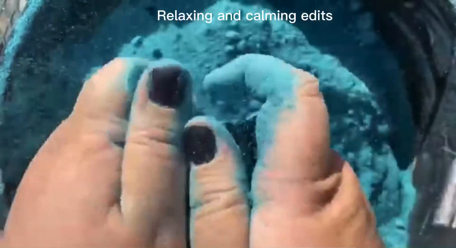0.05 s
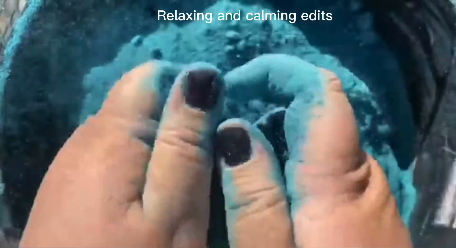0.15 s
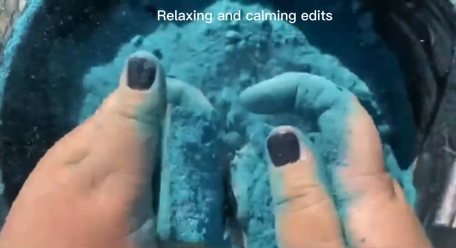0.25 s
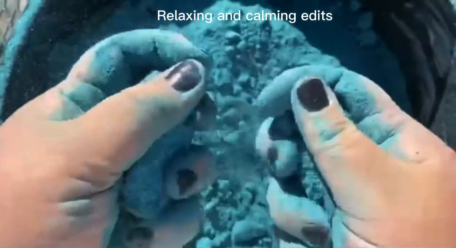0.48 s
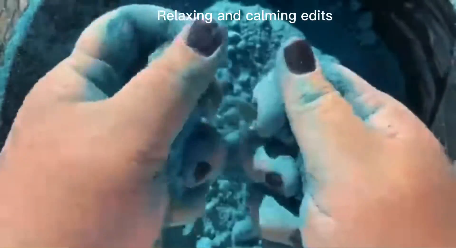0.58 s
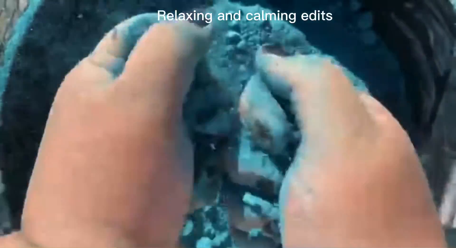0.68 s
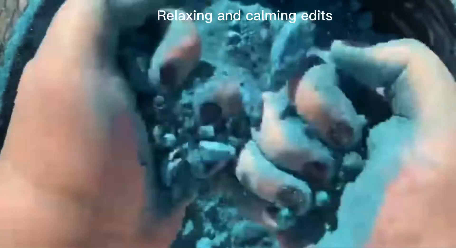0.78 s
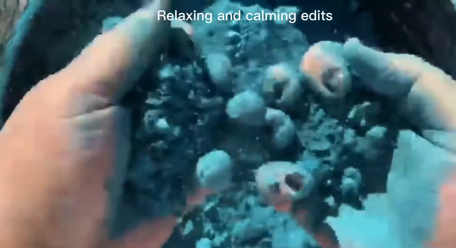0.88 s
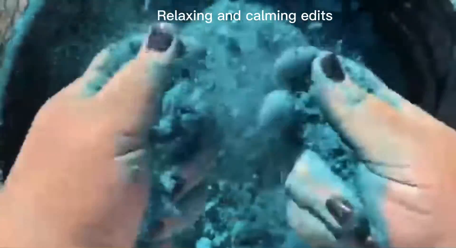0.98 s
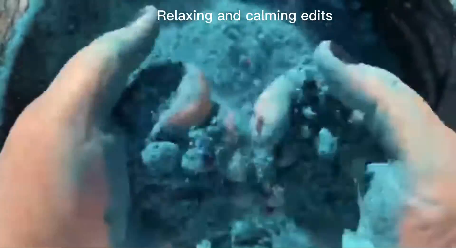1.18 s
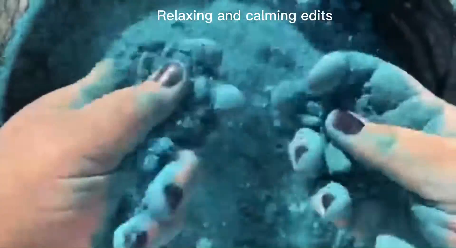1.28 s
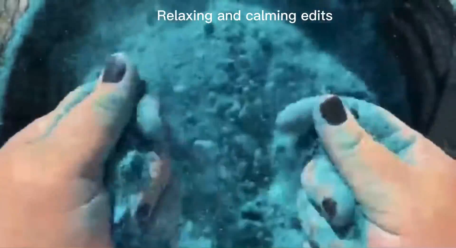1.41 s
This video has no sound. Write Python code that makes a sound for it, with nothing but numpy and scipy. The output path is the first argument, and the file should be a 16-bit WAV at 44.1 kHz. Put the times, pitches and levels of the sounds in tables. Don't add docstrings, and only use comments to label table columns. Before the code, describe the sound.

Dry chalk snapping and crumbling in two hands, crackling softly as crumbs fall into powder

```python
import sys
import numpy as np
from scipy import signal
from scipy.io import wavfile

SR = 44100
rng = np.random.default_rng(int(sys.argv[2]) if len(sys.argv) > 2 else 0)


def unload_audio(sound):
    columns = np.transpose(np.atleast_2d(sound))
    steps = np.round(np.clip(columns, -1, 1) * 32767)
    wavfile.write(sys.argv[1], SR, steps.astype(np.int16))


def undo_db(level):
    steps = np.asarray(level, float) / 20
    return 10 ** steps


N = 63945


def rms_one(x):
    return x / np.sqrt(np.mean(x ** 2) + 1e-20)


def along(rows, x, log=False):
    a, b = np.transpose(rows)
    if log:
        return np.interp(np.log(x), np.log(a), b)
    return np.interp(x, a, b)


def drift(rate_hz):
    step = 40
    r = np.exp(-2 * np.pi * rate_hz * step / SR)
    slow = signal.lfilter([1], [1, -2 * r, r * r], rng.standard_normal(N // step + 2002))
    slow = slow[2000:]
    return np.interp(np.arange(N) / step, np.arange(len(slow)), rms_one(slow))


def band_pass(x, low_hz, high_hz):
    return signal.sosfilt(signal.butter(2, [low_hz, high_hz], "band", fs=SR, output="sos"), x)


def ring(clicks, hz, t60):
    r = 10 ** (-3 / (t60 * SR))
    w = 2 * np.pi * hz / SR
    return signal.lfilter([0, np.sin(w)], [1, -2 * r * np.cos(w), r * r], clicks + 1e-18)


def grains(shape, spread_db):
    size = undo_db(spread_db * np.minimum(rng.exponential(1, shape), 4))
    return size * rng.choice([-1, 1], shape)


def add(out, s, x):
    i = int(s * SR)
    out[i:i + len(x)] += x[:len(out) - i]


def pulse(db, hz, cycles):
    u = np.arange(3000) / SR * hz
    x = -np.sin(2 * np.pi * u) * u * np.exp(-u / cycles * 2)
    x = signal.lfilter(*signal.butter(2, hz / 2.8, "high", fs=SR), x)
    return undo_db(db) * x / np.abs(x).max()


def fracture(out, s, db, hz, cycles, edge_db):
    t = np.arange(60) / SR
    edge = np.diff(rng.standard_normal(61)) * np.exp(-t / .0004)
    add(out, s, pulse(db, hz, cycles))
    add(out, s + .4 / hz, undo_db(db + edge_db) * edge)


def snaps():
    # (time [s], peak level [dB], pitch [Hz], decay [cycles])
    breaks = [(.2296, -4, 440, .5), (.2304, -12, 6000, 2.5), (.2321, -12, 1000, 1.0),
              (.2338, -3, 2000, 1.0), (.2353, -4, 3800, 1.4), (.3358, -30, 6000, 1.2),
              (.5423, -28, 2100, 1.5), (.5442, -27, 3300, 1.5), (.5475, -32, 600, .6),
              (.5486, -21, 3600, 1.8), (.6279, -11, 520, .6), (.6281, -10, 3800, 1.6),
              (.6284, -14, 5800, 1.6), (.6308, -17, 2200, .9), (.6733, -27, 2900, 2.0),
              (.6802, -21, 330, .6), (.683, -10, 850, .7), (.6838, -19, 280, .6), (.6844, -1, 2000, .75),
              (.6869, -11, 2800, 1.2), (.6893, -19, 2200, 1.2), (.733, -33, 45, .7), (.779, -35, 250, .6),
              (1.0066, -27, 350, .6), (1.0074, -20, 1200, 1.5), (1.011, -22, 800, .8),
              (1.0578, -25, 1700, 1.5)]
    out = np.zeros(N)
    for s, db, hz, cycles in breaks:
        fracture(out, s, db, hz, cycles, edge_db=-20)
    return out


def grit():
    # (time [s], hold [s], rms level [dB], centre [Hz])
    bursts = [(0.052, 0.0079, -42.5, 8400), (.105, .006, -47.5, 8400), (.2295, .0064, -17, 6000),
              (0.2518, 0.01, -38.5, 4000), (0.343, 0.0053, -45, 7400), (0.373, .014, -45.5, 9000),
              (0.506, 0.035, -56, 4080), (0.534, 0.02, -43, 5000), (0.545, 0.0069, -33, 5800),
              (0.6285, 0.0014, -20.5, 6900), (.672, 0.0096, -41, 5000), (0.6804, 0.0067, -22, 4350),
              (.689, .003, -27.5, 2500), (0.711, 0.0067, -45, 1500), (.739, 0.014, -41.5, 3500),
              (.76, 0.023, -45.5, 2190), (.795, .008, -37, 11000), (0.876, 0.0081, -46, 5030),
              (1.005, 0.0099, -35.5, 1180), (1.053, 0.012, -39.5, 1460), (1.076, 0.027, -48.5, 3000),
              (1.08, 0.0067, -42, 1111), (1.12, 0.006, -42, 5400), (1.235, 0.015, -45.5, 3500)]
    rise_s, fall_s = .0005, .0008
    tail_db, tail_s = -20, .005
    out, t = np.zeros(N), np.arange(3000) / SR
    for s, hold, db, hz in bursts:
        noise = grains(len(t), spread_db=4.5)
        noise = rms_one(band_pass(noise, hz / 2 ** 1.5, min(hz * 2.27, .45 * SR)))
        after = np.maximum(t - hold, 0)
        fall = np.exp(-after / fall_s) + undo_db(tail_db) * np.exp(-after / tail_s)
        add(out, s, undo_db(db) * (1 - np.exp(-t / rise_s)) * fall * noise)
    return out


def ticks():
    # (time [s], peak level [dB], pitch [Hz])
    lone_crumbs = [(.038, -36, 1320), (0.2533, -17.5, 4300), (0.2612, -23.5, 3560), (.6614, -41, 2600),
                   (.7118, -35, 2020), (0.7321, -29, 2800), (.748, -27.5, 1690), (0.7562, -23, 2850),
                   (.7685, -30.5, 2450), (0.779, -32, 1770), (0.8017, -35.5, 2800), (0.8476, -29.5, 2430),
                   (0.8797, -33.5, 1880), (0.9284, -30.5, 3000), (.955, -32.5, 2290), (.978, -36, 1910),
                   (1.0246, -32, 2600), (1.033, -29, 1910), (1.08, -33, 2000), (1.11, -36.5, 1190),
                   (1.1235, -44, 3500), (1.1833, -29, 5000), (1.186, -36, 5000), (1.2202, -33, 1550),
                   (1.2651, -31, 2200), (1.332, -32, 8060), (1.3602, -30.5, 2800), (1.379, -34, 1740),
                   (1.392, -28, 2350), (1.435, -36, 2500)]
    cycles, edge_db = .7, -11
    bounce_s, bounce_db = .0025, -9
    out = np.zeros(N)
    for s, db, hz in lone_crumbs:
        fracture(out, s, db, hz, cycles, edge_db)
        for late, size in rng.random((2, 2)):
            bounce_time = s + (.2 + late) * bounce_s
            fracture(out, bounce_time, db + bounce_db, hz * (.6 + size), 2 * cycles, edge_db)
    return out


def knock():
    # (pitch [Hz], level [dB], t60 [s])
    wall_modes = [(680, -15, 0.041), (1010, -4, .018), (1340, 0.5, .018), (1860, -16, 0.0082),
                  (2530, -14.5, 0.012), (2960, -16, 0.014)]
    click = np.zeros(N)
    click[int(1.1669 * SR)] = undo_db(-13)
    click = signal.sosfilt(signal.butter(4, 3500, fs=SR, output="sos"), click)
    wall = sum(undo_db(db) * ring(click, hz, t60) for hz, db, t60 in wall_modes)
    return signal.sosfilt(signal.butter(3, 650, "high", fs=SR, output="sos"), wall)


def crumbs():
    # (time [s], level [dB], coarseness [dB per octave])
    flow = [(0, -57, 1.5), (.2, -64.5, 2.7), (.3, -57.5, 3.8), (.36, -50, -0.7), (.45, -58, -3.5),
            (.58, -49.5, -0.3), (.65, -48.5, 0.7), (.71, -45, 1), (.82, -49, 1.7), (.89, -46.5, -1),
            (.94, -48, 1.9), (1.0, -43.5, 1.5), (1.12, -43, 2.5), (1.14, -47.5, 2), (1.25, -50.5, 1.2),
            (1.3, -51.5, -0.7), (1.39, -45.5, 1), (1.45, -46, 0.5)]
    # (pitch [Hz], level [dB])
    grain_colour = [(600, 3), (1500, -1), (3000, 3.3), (5500, -4), (9000, 2.5), (12000, 2.5), (15500, -1.5)]
    crumbs_per_s, ring_cycles = 24000, 3.0
    gust_db, patch_db = 1.0, 1.5
    s, db, coarse = np.transpose(flow)
    time = np.arange(N) / SR
    db, coarse = np.interp(time, s, db), np.interp(time, s, coarse)
    born = grains(N, spread_db=3.5) * (rng.random(N) < crumbs_per_s / SR)
    pitches = np.geomspace(600, 15500, 24)
    dealt = (24 * rng.random(N) ** .5).astype(int)
    rain = 0
    for k, hz in enumerate(pitches):
        colour_db = along(grain_colour, hz, True) + coarse * np.log2(6000 / hz) + patch_db * drift(20)
        ringing = rms_one(ring(born * (dealt == k), hz, ring_cycles * 3 / hz))
        rain = rain + undo_db(colour_db) * np.sqrt(hz / 93000.0) * ringing
    return undo_db(db + gust_db * drift(71)) * rain


def rumble():
    # (time [s], level [dB])
    handling = [
        (0.0, -70),
        (0.044, -45.5),
        (0.084, -65),
        (0.242, -39.5),
        (0.302, -53),
        (0.75, -46.5),
        (0.92, -58.5),
        (1.05, -42.5),
        (1.45, -46.5),
    ]
    centre_hz, width_hz = 97.9, 44.6
    noise = rng.standard_normal(N + SR)
    hum = band_pass(noise, centre_hz - width_hz / 2, centre_hz + width_hz / 2)[SR:]
    return undo_db(along(handling, np.arange(N) / SR)) * rms_one(hum)


def air():
    # (frequency [Hz], level [dB per Hz])
    air_colour = [(20, 4.4), (60, -3), (110, -15.5), (180, -14.5), (600, -13.5), (1500, -24), (3000, -38.5),
                  (16000, -40.5)]
    edges = 20 * 2 ** np.arange(0, 10, .5)
    white = rng.standard_normal((2, N + SR))
    out = 0
    for k, (low, high) in enumerate(zip(edges, edges[1:])):
        band = band_pass(white[k % 2], low, high)[SR:]
        level_db = along(air_colour, np.sqrt(low * high), True) + 3 * drift(9.4)
        out = out + undo_db(level_db) * band
    return undo_db(-46.5) * rms_one(out)


def scene():
    return (snaps() + grit() + ticks() + knock() + crumbs() + rumble() + air())[None]


def top_cut(x):
    return signal.sosfilt(signal.butter(12, 16830, fs=SR, output="sos"), x)


def record(dry):
    port_hz, port_width_hz, port_gain = 9000, 1740, 0.42
    port = signal.lfilter(*signal.iirpeak(port_hz, port_hz / port_width_hz, SR), dry)
    x = dry + port_gain * port
    x = signal.lfilter(*signal.butter(1, 12240, fs=SR), x)
    x = np.clip(x + .0029, -1, 1)
    x = signal.sosfilt(signal.cheby2(16, 60, 16000 * 1.03, fs=SR, output="sos"), x)
    return top_cut(x)


dry = scene()
out = record(dry)
unload_audio(out)
```